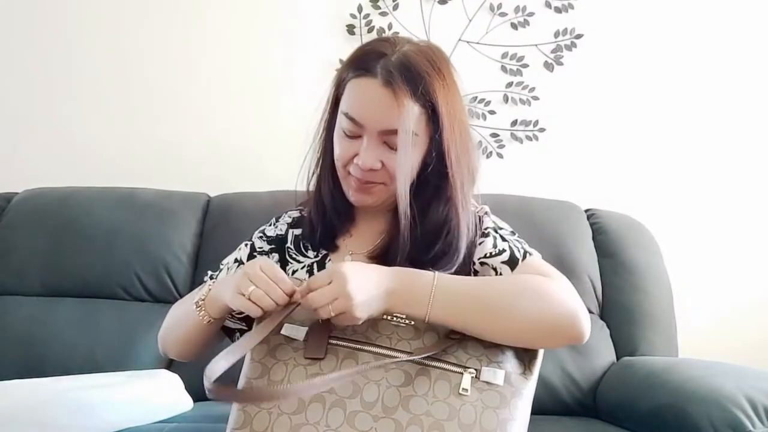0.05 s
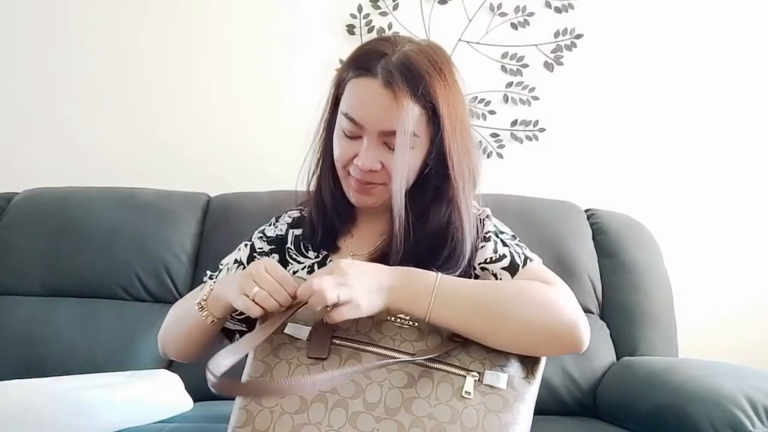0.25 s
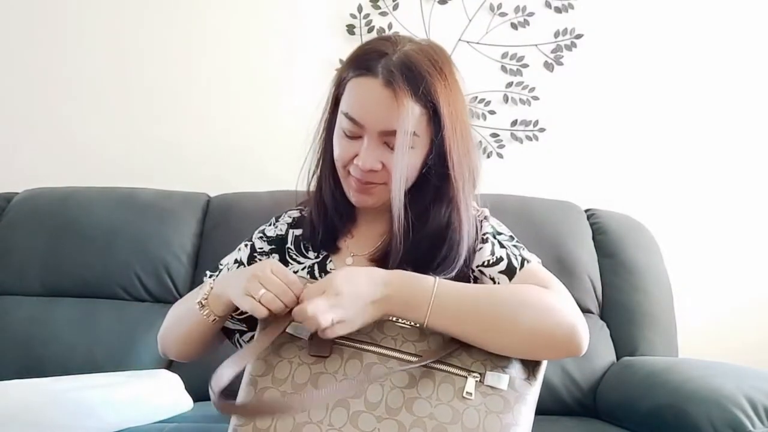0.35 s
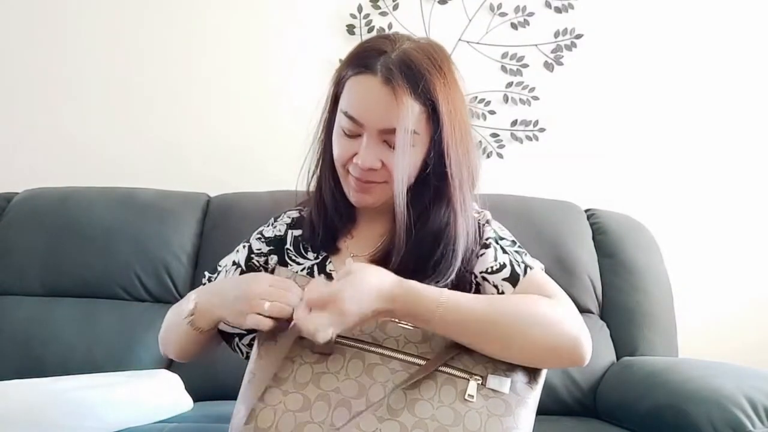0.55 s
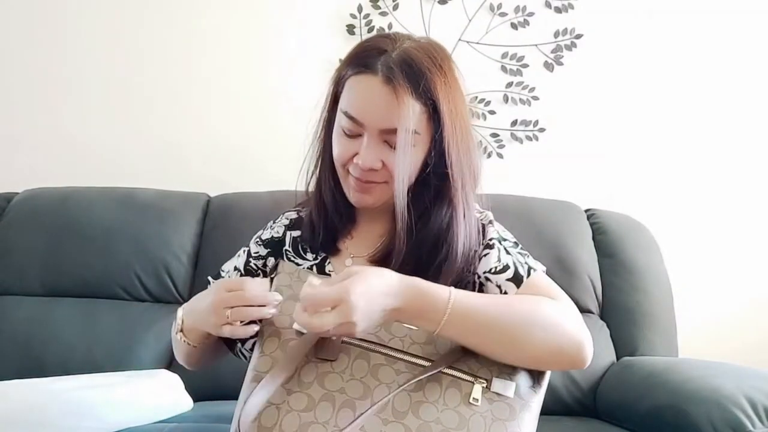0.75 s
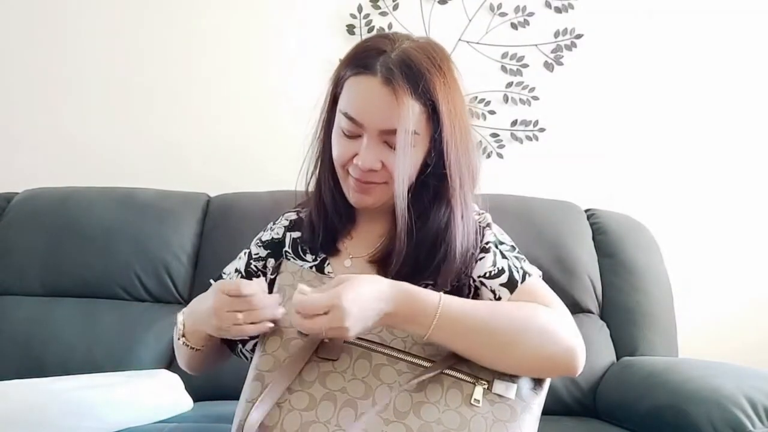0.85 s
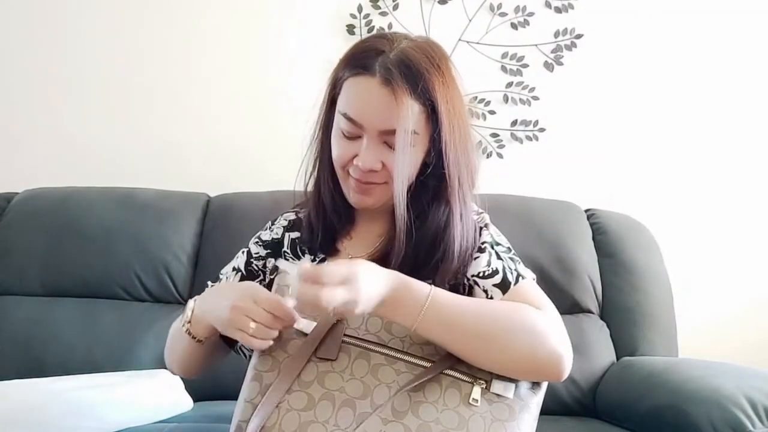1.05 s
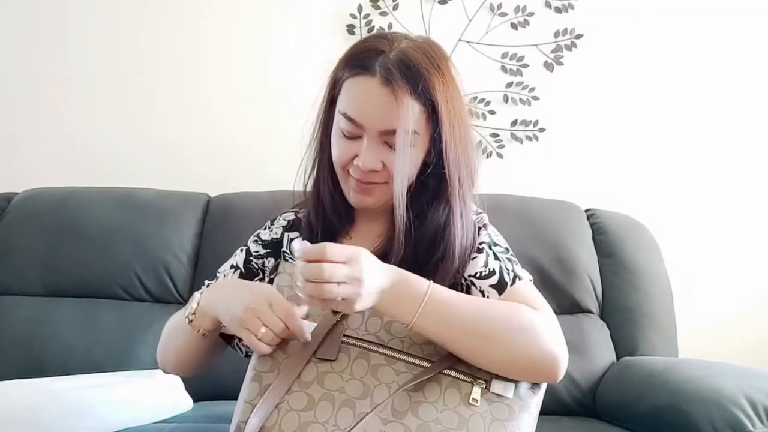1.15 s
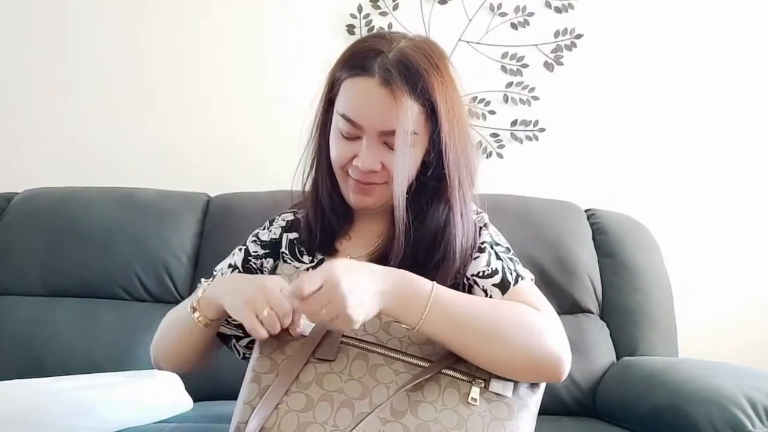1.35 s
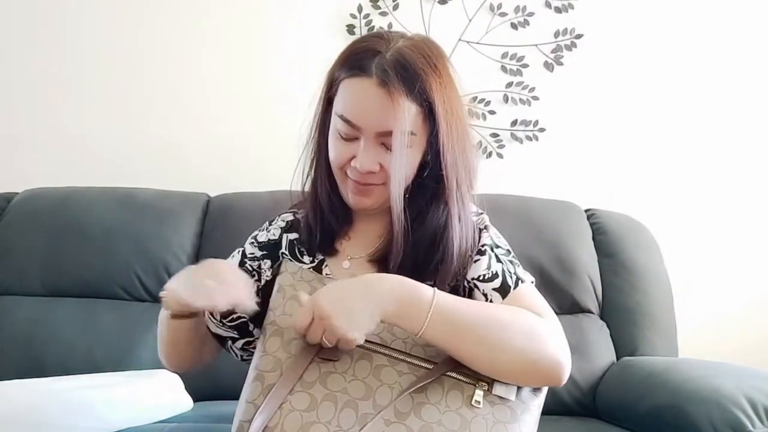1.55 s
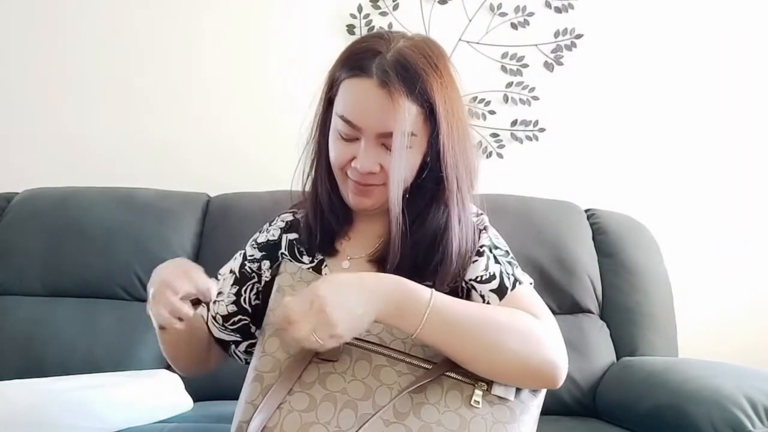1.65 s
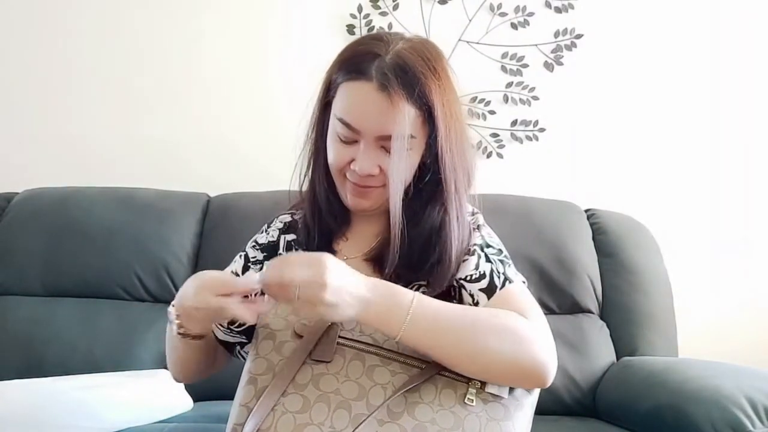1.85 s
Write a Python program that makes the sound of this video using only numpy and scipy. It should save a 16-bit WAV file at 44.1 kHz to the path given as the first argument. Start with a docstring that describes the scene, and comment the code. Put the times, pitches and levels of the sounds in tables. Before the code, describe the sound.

In a slightly echoing living room, a bag clasp gives a small click and then a hard snap that overloads the microphone. Quiet handling follows, with fabric sliding, fittings ticking and fingers tapping the bag over room hiss.

```python
"""A handbag fastener snaps shut

A handbag is handled on a sofa in an echoing living room, a little way from a two-port microphone.
Its strap slides, small metal fittings tick and fingers bump the padded bag, over a steady hiss.
A fastener clicks, scrapes, then snaps hard enough to overload the microphone, and the room rings on.
The quiet sliding, ticking and bumping carry on afterwards."""
import sys
import numpy as np
from scipy import signal
from scipy.fft import rfft, irfft
from scipy.io import wavfile

SR = 44100
rng = np.random.default_rng(int(sys.argv[2]) if len(sys.argv) > 2 else 0)


def wrap_up_sound(samples):
    """Save the sound to the file named by the first command line argument, as 16-bit audio."""
    columns = np.atleast_2d(samples).T
    # keep every value between -1 and 1, then stretch to whole-number steps
    tamed = np.clip(columns, -1, 1)
    steps = np.round(tamed * 32767).astype(np.int16)
    wavfile.write(sys.argv[1], SR, steps)


N = 83790

# The tone of the room's hiss. Each row: frequency in Hz, relative level in dB.
HISS_TONE = [(25, -3.5), (60, -7.5), (120, -0.5), (220, 4.5), (450, -2), (900, -4.5), (2000, -9),
             (4500, -15), (7500, -35.5), (10000, -17.5), (15500, -13)]
# How alike the two ports hear sound from all around. Each row: frequency in Hz, likeness from 0 to 1.
PORT_LIKENESS = [(30, 0.5), (150, 0.25), (500, 0.39), (1200, 0.21), (2500, 0), (16000, 0)]
# Strap and fingers slide. Each row: peak time, rise and fall in seconds, relative level in dB,
# frequency in Hz above which it is bright.
SLIDES = [(.01, .05, 0.026, -41, 2070), (.095, 0.035, 0.029, -42.5, 5060), (.172, .015, 0.013, -37.5, 1000),
          (0.202, 0.0088, 0.024, -31.5, 2000), (.4, 0.045, 0.0073, -43, 2500),
          (0.843, 0.013, 0.023, -40.5, 4530), (.965, 0.054, 0.073, -47, 1970),
          (1.161, 0.062, 0.096, -43.5, 3700), (1.318, 0.011, .025, -36, 5000),
          (1.359, 0.012, 0.013, -30.5, 3330), (1.5, 0.035, 0.073, -43.5, 4000),
          (1.655, 0.028, 0.067, -43, 3000), (1.719, 0.02, 0.039, -44.5, 3500),
          (1.81, 0.049, .06, -46, 4000), (1.898, 0.02, .02, -36, 2500)]
# The tone of sliding fabric. Each row: frequency in Hz, relative level in dB.
FABRIC_TONE = [(100, -16), (400, 7), (1200, -2.5), (3000, -2.5), (5500, -3.5), (7300, 0.5), (10000, -6),
               (16000, -14.5)]
# Metal fittings touch. Each row: start in seconds, relative level in dB, centre frequency in Hz.
FITTING_TICKS = [(.0612, -21, 7940), (.0845, -17, 10000), (.3805, -17.5, 7700), (.3872, -19, 7900),
                 (.3975, -40, 6500), (0.8421, -18, 8056), (1.1726, -6, 8100), (1.3096, -14, 6500),
                 (1.4975, -21, 7000), (1.7578, -15.5, 8300), (1.8815, -11, 6100), (1.8952, -9, 6000)]
# Fingers hit the bag. Each row: start in seconds, relative level in dB, treble cutoff in Hz.
FINGER_BUMPS = [(.089, -22, 398), (0.1, -18.5, 485), (0.442, -11, 513), (.515, -10.5, 715),
                (.559, -11.5, 440), (0.601, -18, 2020), (.859, -13.5, 1620), (.867, -21, 244),
                (0.9, -21, 340), (0.948, -20, 1190), (1.094, -17, 1410), (1.174, -14.5, 3980),
                (1.1976, -8.5, 1050), (1.2003, -17, 348), (1.35, -33, 2480), (1.613, -21.5, 1010)]
# The padded bag's ringing notes. Each row: pitch in Hz, relative level in dB, seconds to fade 60 dB.
BAG_NOTES = [(191, -2, 0.076), (275, 4, 0.023), (397, -2.5, 0.034), (590, 2, 0.008), (787, 1.5, 0.0062),
             (1090, -4, 0.012), (1780, 14, 0.0036)]
# The tone of the fastener's first click. Each row: frequency in Hz, relative level in dB.
CLICK_TONE = [(80, -25), (300, -18), (500, -6), (720, -6), (1200, 0.5), (1700, 6.5), (2700, -2.5),
              (3300, -6), (4200, 7), (6000, -3.5), (8000, -8), (16000, -13)]
# That click's ringing notes. Each row: pitch in Hz, relative level in dB, seconds to fade 60 dB.
CLICK_NOTES = [(730, -3, .011), (1700, -6, .006), (3300, -3, .004), (4200, 2, .004)]
# The tone of the snap's crack. Each row: frequency in Hz, relative level in dB.
CRACK_TONE = [(60, -41), (250, -22), (700, -12.5), (1300, -31.5), (2000, -9.5), (3200, -8), (4600, -7),
              (5800, -3.5), (6700, -1.5), (7750, 4), (9000, -3), (10300, -4), (12000, -8.5), (16000, -7.5)]
# Fastener and leather ring. Each row: pitch in Hz, relative level in dB, seconds to fade 60 dB.
SNAP_NOTES = [(280, -24, .012), (1326, 1.5, 0.011), (2590, -9.5, 0.01)]
# Echoes off nearby surfaces. Each row: delay in seconds, extra delay at the right port in seconds.
NEAR_ECHOES = [(.0081, .0001), (.0112, -.00015)]
# How long the room rings. Each row: frequency in Hz, seconds to fade 60 dB.
TAIL_FADE = [(200, 0.22), (530, 0.57), (1400, 0.4962), (3700, 0.67), (7500, 0.5843), (15000, 0.52)]
# The tone of the room's ringing. Each row: frequency in Hz, relative level in dB.
TAIL_TONE = [(60, 0), (250, 1.5), (800, 1), (1400, 1), (4000, 4), (7500, -1), (15000, -1)]

SNAP_AT_S = .4057


def amp(db):
    """Turns decibels into a number to multiply by."""
    return 10 ** (np.asarray(db) / 20)


def unit(x):
    """Scales a sound to an energy of one."""
    return x / np.sqrt(np.sum(x ** 2) + 1e-20)


def read(table, hz):
    """Looks up a value between a table's rows, with octaves evenly spaced."""
    f, value = np.transpose(table)
    return np.interp(np.log(hz + 1), np.log(f), value)


def freqs(size):
    """Lists the frequencies in the spectrum of a sound this many samples long."""
    return np.fft.rfftfreq(size, 1 / SR)


def add(mix, start_s, sound):
    """Mixes a sound in at a given time."""
    part = mix[max(round(start_s * SR), 0):][:len(sound)]
    part += sound[:len(part)]


def pulse(db, size=4096):
    """Makes the shortest sudden click that has the given tone."""
    log_gain = np.log(amp(np.r_[db, db[-2:0:-1]]))
    spectrum = np.exp(np.conj(signal.hilbert(log_gain)))
    return unit(np.fft.ifft(spectrum).real[:size // 2])


def burst(fade_s, size=2048):
    """Touching parts make a scatter of noise that dies quickly."""
    fade = np.exp(-np.log(1000) * np.arange(size) / SR / fade_s)
    noise = rng.standard_normal(size) * fade
    for _ in range(4):  # even out the tone, then fade again
        noise = irfft(np.exp(1j * np.angle(rfft(noise))), size) * np.sqrt(fade)
    return unit(noise)


def ring(notes, size=4096):
    """A struck object rings with a few fading notes."""
    t = np.arange(size) / SR
    return unit(sum(amp(db) * np.exp(-np.log(1000) * t / fade_s) * np.cos(2 * np.pi * hz * t)
                    for hz, db, fade_s in notes))


def surrounding_noise(size):
    """Noise from all around gives each port its own spectrum, partly alike in the bass."""
    left, other = rfft(rng.standard_normal((2, size)))
    same = read(PORT_LIKENESS, freqs(size))
    return np.array([left, same * left + np.sqrt(1 - same ** 2) * other])


def room_hiss(level_db=-50):
    """The air of the room hisses steadily."""
    noise = irfft(surrounding_noise(N) * amp(read(HISS_TONE, freqs(N))), N)
    return amp(level_db) * np.sqrt(2 * N) * unit(noise)


def strap_slides(slips_per_s=16000, spread_db=1.8, bass_db=-12):
    """Each slide is a swell of tiny slips in the weave."""
    out, t, f = np.zeros(N), np.arange(N) / SR, freqs(N)
    for peak_s, rise, fall, db, hz in SLIDES:
        slips = rng.standard_normal(N) * (rng.random(N) < slips_per_s / SR)
        slips *= amp(spread_db * np.minimum(rng.exponential(1, N), 3))
        tone = amp(read(FABRIC_TONE, f)) * (amp(bass_db) + f ** 2 / (f ** 2 + hz ** 2))
        swell = np.exp(-.5 * ((t - peak_s) / np.where(t < peak_s, rise, fall)) ** 2)
        out += amp(db) * swell * np.sqrt(N) * unit(irfft(rfft(slips) * tone, N))
    return out


def fitting_ticks(width_octaves=.3, floor_db=-11, low_cut_hz=700):
    """Small metal fittings touch, each ringing in one broad, bright band."""
    out, f = np.zeros(N), freqs(4096) + 1
    for start_s, db, hz in FITTING_TICKS:
        band = np.exp(-.5 * (np.log2(f / hz) / width_octaves) ** 2)
        tone = (band + amp(floor_db)) * f / (f + low_cut_hz)
        tick = signal.fftconvolve(pulse(20 * np.log10(tone)), burst(fade_s=.005))
        add(out, start_s, amp(db) * unit(tick))
    return out


def finger_bumps(low_cut_hz=169):
    """The softer the finger, the duller the bump; the bag gives off hardly any deep bass."""
    out = np.zeros(N)
    body = signal.lfilter(*signal.butter(2, low_cut_hz, "high", fs=SR), ring(BAG_NOTES))
    for start_s, db, hz in FINGER_BUMPS:
        bump = signal.lfilter(*signal.butter(2, hz, fs=SR), body)
        add(out, start_s, amp(db) * unit(bump))
    return out


def fastener_click(start_s=.2074, level_db=1.7, ring_db=-3, chatter_db=-9):
    """The fastener catches with a dull click, a short ring and a little chatter."""
    out, click = np.zeros(N), pulse(read(CLICK_TONE, freqs(4096)))
    add(out, start_s, click)
    add(out, start_s + .0003, amp(ring_db) * ring(CLICK_NOTES))
    add(out, start_s, amp(chatter_db) * signal.fftconvolve(click, burst(fade_s=.035)))
    return amp(level_db) * out


def fastener_scrape(length_s=.016, centre_hz=5370, width_octaves=.56, end_db=-32.5, growth_db=9):
    """Rubbing grows louder as the fastener is pressed, and stops at the snap."""
    out, size = np.zeros(N), round(length_s * SR)
    band = np.exp(-.5 * (np.log2((freqs(size) + 1) / centre_hz) / width_octaves) ** 2)
    noise = np.sqrt(size) * unit(irfft(rfft(rng.standard_normal(size)) * band, size))
    add(out, SNAP_AT_S - length_s, noise * amp(end_db + np.linspace(-growth_db, 0, size)))
    return out


def fastener_snap(level_db=18.55, knock_db=-13, scatter_s=.0026, step_hz=300, size=4096):
    """The fastener springs home with a bright crack and a short, hollow knock."""
    out, f = np.zeros(N), freqs(size)
    steps = np.arange(0, SR / 2, step_hz)
    margin_s = size / SR / 2
    # Each part of the crack's spectrum arrives at a slightly different time.
    delay = margin_s + scatter_s * np.interp(f, steps, rng.random(len(steps)))
    crack = irfft(amp(read(CRACK_TONE, f)) * np.exp(-2j * np.pi * np.cumsum(delay) * f[1]))
    add(out, SNAP_AT_S - margin_s, unit(crack))
    add(out, SNAP_AT_S, amp(knock_db) * ring(SNAP_NOTES))
    return amp(level_db) * out


def direct_paths(f, lag_s=.00009, limit_radians=1.4):
    """Sound reaches the left port first; in the treble its phase lead levels off."""
    lead = limit_radians * np.tanh(2 * np.pi * f * lag_s / limit_radians)
    return np.exp(-1j * np.array([0 * f, lead]))


def room_tail(size, delay_s=.004, build_s=.02, wall_s=.0385, spread_s=.003, wall_db=4):
    """Countless echoes build up and fade, with a louder cluster from the far walls."""
    age = np.arange(size) / SR
    hz, t, bands = signal.stft(irfft(surrounding_noise(size)), SR, nperseg=256)
    fade = np.exp(-np.log(1000) * t / read(TAIL_FADE, hz)[:, None])
    tail = signal.istft(bands * fade, SR, nperseg=256)[1][:, :size]
    walls = amp(wall_db * np.exp(-.5 * ((age - wall_s) / spread_s) ** 2))
    build = np.sqrt(np.clip((age - delay_s) / build_s, 0, 1))
    return np.sqrt(2) * unit(tail * walls * build)


def room(sound, echo_db=-12.5, step_db=-7, tail_db=-3.5, size=32768):
    """Each port hears the direct sound, two nearby echoes and the room ringing on."""
    f = freqs(size)
    paths = direct_paths(f)
    for k, (delay_s, lag_s) in enumerate(NEAR_ECHOES):
        arrivals = np.array([[delay_s], [delay_s + lag_s]])
        paths += amp(echo_db + k * step_db) * np.exp(-2j * np.pi * f * arrivals)
    paths += rfft(room_tail(size)) * amp(tail_db + read(TAIL_TONE, f))
    margin = 128  # samples that hold the ripple just before the direct sound
    response = np.roll(irfft(paths), margin, axis=1)
    return signal.fftconvolve(sound[None], response, axes=1)[:, margin:margin + N]


def scene(slides_db=-3, ticks_db=-1, bumps_db=-1):
    """All the handling sounds play in the room, over its hiss."""
    handling = fastener_click() + fastener_scrape() + fastener_snap()
    handling += amp(ticks_db) * fitting_ticks()
    handling += amp(bumps_db) * finger_bumps()
    handling += amp(slides_db) * strap_slides()
    return room(handling) + room_hiss()


def record(dry, ceiling=.95, top_hz=15900):
    """The snap overloads the microphone, flattening its peaks; then the highest treble is cut."""
    clipped = np.clip(dry, -ceiling, ceiling)
    treble_cut = signal.firwin(511, top_hz, window=("kaiser", 9), fs=SR)
    return signal.oaconvolve(clipped, treble_cut[None], "same")


dry = scene()
out = record(dry)
wrap_up_sound(out)
```